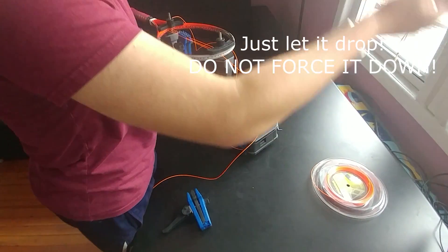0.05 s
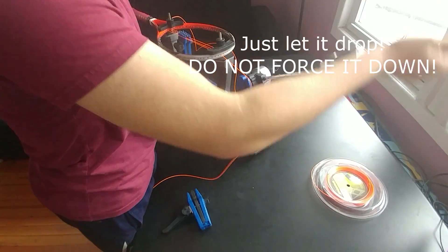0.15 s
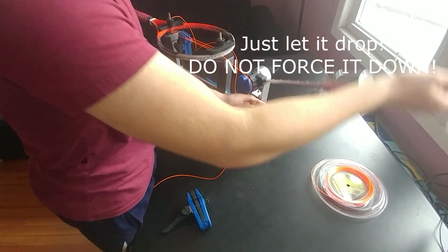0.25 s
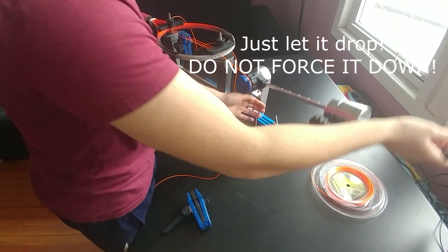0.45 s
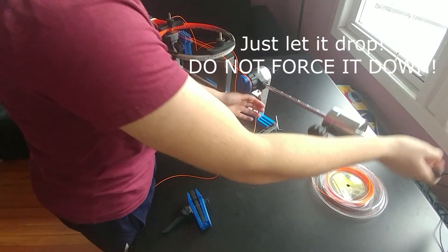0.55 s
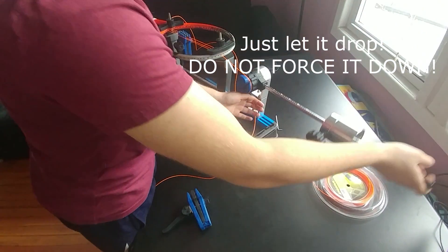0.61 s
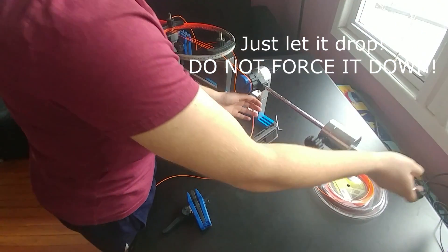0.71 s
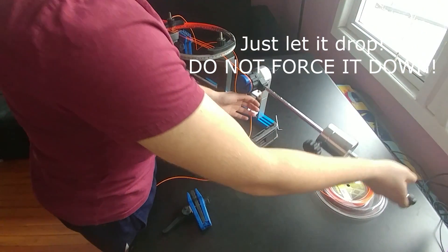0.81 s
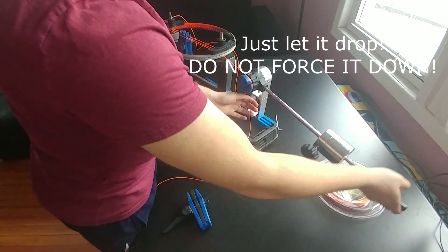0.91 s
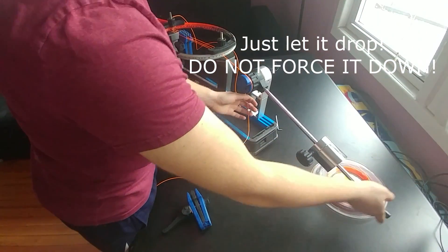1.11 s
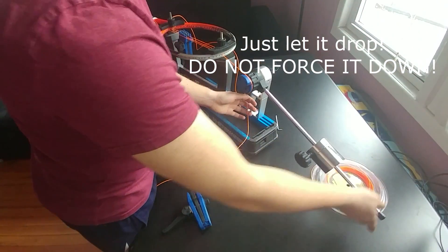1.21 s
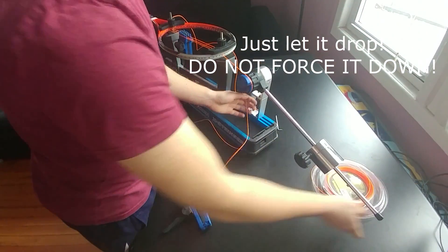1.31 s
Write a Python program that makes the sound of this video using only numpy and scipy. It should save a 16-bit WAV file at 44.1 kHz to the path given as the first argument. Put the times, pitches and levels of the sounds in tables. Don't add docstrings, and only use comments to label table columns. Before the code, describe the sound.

A single sharp click of a drop-weight stringing machine cracks close to the microphone, with a short high string ping and hard room reflections, then only faint soft thuds over low rumble and hiss.

```python
import sys
import numpy as np
from scipy import signal
from scipy.io import wavfile
from scipy.ndimage import uniform_filter1d

SR = 44100
rng = np.random.default_rng(int(sys.argv[2]) if len(sys.argv) > 2 else 0)


def gain_from_db(level_db):
    decades = np.asarray(level_db, float) / 20
    return 10 ** decades


def persist_wave(psi):
    counts = np.round(np.clip(psi, -1, 1) * 32767).astype(np.int16)
    wavfile.write(sys.argv[1], SR, np.atleast_2d(counts).T)


N = 59535

# pitch_hz, level_db [dB per Hz]
RUMBLE_SPECTRUM = [(15, -34), (25, -9.5), (69, 3), (144, -7.5), (229, -7), (300, -8.5), (525, -14.5),
                   (1110, -26.5), (2500, -39), (3250, -75), (5500, -120)]
# start_s, level_db, bright_db [extra above 400 Hz]
RUMBLE_SWELL = [(0, 7.5, -4.5), (0.099, 3.5, 1), (.19, 4.5, 0), (.4, 2, 0.5), (0.529, 0, -1), (.63, 0, -3),
                (.67, 1.5, 8.5), (0.751, -0.5, -0.5), (.87, 1.5, 0.5), (.96, -3, 6), (1.031, 2, 1.5),
                (1.125, -5, 5), (1.2, 2, -4), (1.35, -2.5, 7.5)]
# pitch_hz, level_db [dB per Hz]
HISS_SPECTRUM = [(880, -44), (1500, -4.5), (1720, -4.5), (5490, -8.5), (15100, -11.5), (16000, -13)]
# pitch_hz, likeness [-1 to 1]
PORT_LIKENESS = [(60, 0.71), (150, 0.86), (380, 0.59), (950, -0.078), (2380, 0.0), (5980, -0.03),
                 (15000, -0.02)]
# pitch_hz, level_db, t60_s
TABLE_MODES = [(57, 5.5, 0.35), (72, -0.5, 0.34), (122.2, 2, 0.14), (150.4, 1, 0.28), (230, 2.5, .3),
               (342.3, -2, 0.4), (521, 0.5, 0.19), (697, -3, 0.22), (858, -2.5, 0.21)]
# start_s, level_db, centre_hz, spread_octaves, rise_s
TABLE_THUDS = [(.208, -44, 653, 0.88, 0.0013), (.225, -45, 57, .25, 0.017), (0.256, -41, 225, 0.18, 0.027),
               (.3, -50, 222, 0.32, 0.0046), (0.376, -58, 220, 0.15, 0.0064),
               (0.569, -53.5, 230, 0.26, .01), (0.344, -53, 70, 0.29, 0.012),
               (0.65, -57.5, 297, 0.64, 0.0072), (0.67, -40.5, 72, 0.18, 0.005),
               (0.711, -49, 230, 0.27, 0.0067), (0.842, -53.5, 63.7, 0.27, 0.018),
               (.994, -45.5, 139, 0.57, 0.0075), (1.016, -52.5, 57, 0.32, 0.0061),
               (1.167, -54, 57, 0.21, 0.0057), (1.291, -50, 230, 0.25, 0.015),
               (1.331, -55.5, 146, .6, 0.0056), (.03, -48.5, 57, 0.39, 0.033),
               (.21, -49, 135, 0.65, 0.0016), (1.272, -55.5, 57, 0.25, 0.012)]
# start_s, level_db, right_minus_left_db
STRING_SLIPS = [
    (.2052, -31, 1),
    (.2070, -7, 1),
    (.2086, -7, 10),
    (.2100, -3, 12),
    (.2128, -3, 5),
    (.2145, -6, -2),
]
# pitch_hz, level_db
DIRECT_CRACK = [(300, -23.5), (2000, -17.5), (5000, -9.5), (8000, -9), (16000, -4)]
# pitch_hz, level_db
ROOM_CRACK = [(300, -9.5), (950, -3.5), (1300, -13), (2200, -8.5), (2600, -9.5), (4200, -6.5), (4600, -7),
              (7500, -7.5)]
# pitch_hz, level_db
PORT_RESONANCE = [(7600, -1), (8200, 4.5), (9100, 11.5), (9600, -5), (10300, -7.5), (10750, -27),
                  (11600, -2), (15500, -3.5)]
# pitch_hz, t60_s
ROOM_DECAY = [(200, 0.85), (700, 0.18), (2000, 0.32), (6000, 0.26), (9000, 0.25), (14000, 0.18)]
# pitch_hz, level_db, t60_s
STRING_PARTIALS = [(1116, -1, 0.25), (1122, -11.5, 0.23), (988, -13, 0.16), (2275, -16.5, .36),
                   (2260, -9, 0.1), (3434, -16.5, 0.24), (4670, -14.5, .3), (5830, -15, 0.32),
                   (7060, -18.5, 0.24), (9020, -11.5, .2)]
# start_s, end_s, low_hz, high_hz
SILENT_BANDS = [
    (.232, .355, 10350, 11000),
    (.282, .355, 9650, 11000),
    (.308, .335, 10350, 11600),
]

RUMBLE_DB, HISS_DB = -57, -75
HUM_HZ, HUM_WIDTH_HZ, HUM_DB = 220, 11.7, 8
DIRECT_T60_S, DIRECT_DB = .014, -23
PORT_LAG_S = .0001
ROOM_DB, ROOM_RISE_S = -2, .011
ROOM_BEND_DB = -300
ROOM_MONO_HZ = 610
PING_DB, PING_ROOM_DB = -32, -7
PING_TURN = 1.52
TIGHTEN, TIGHTEN_S = .035, .0312
DAMP_DB = -700
BUZZ_DB, BUZZ_S = 5, .0058
EDGE_HZ = 15620


def evened(x):
    return x / np.sqrt(np.mean(x ** 2) + 1e-20)


def read(points, hz):
    f, value = np.transpose(points)
    return np.interp(np.log(hz + 1), np.log(f + 1), value)


def add(mix, s, sound):
    part = mix[..., round(s * SR):][..., :sound.shape[-1]]
    part += sound[..., :part.shape[-1]]


def noise(field_db, same):
    a, b, c, d = rng.standard_normal((field_db.shape[1], 513, 4)).T
    same = np.clip(same, -1, 1)[:, None]
    left = a + 1j * b
    right = same * left + np.sqrt(1 - same ** 2) * (c + 1j * d)
    z = np.array([left, right]) * gain_from_db(field_db)
    return evened(signal.istft(z, nperseg=1024, noverlap=768)[1][:, :N])


def floor():
    hz = np.fft.rfftfreq(1024, 1 / SR)
    t = np.arange(N // 256 + 5) * 256 / SR
    hum_db = HUM_DB * np.exp(-((hz - HUM_HZ) / HUM_WIDTH_HZ) ** 2 / 2)
    at, swell_db, bright_db = np.transpose(RUMBLE_SWELL)
    rumble_db = (read(RUMBLE_SPECTRUM, hz) + hum_db)[:, None] + np.interp(t, at, swell_db)
    rumble_db = rumble_db + np.interp(t, at, bright_db) * (hz / (hz + 400))[:, None] ** 2
    rumble = noise(rumble_db, read(PORT_LIKENESS, hz))
    hiss = noise(read(HISS_SPECTRUM, hz)[:, None] + 0 * t, 0 * hz)
    return gain_from_db(RUMBLE_DB) * rumble + gain_from_db(HISS_DB) * hiss


def table():
    out, t = np.zeros(N), np.arange(0, .5, 1 / SR)
    chance = rng.random((len(TABLE_THUDS), len(TABLE_MODES), 2))
    for (s, db, centre_hz, spread, rise), draw in zip(TABLE_THUDS, chance):
        ring = np.zeros(len(t))
        for (hz, mode_db, t60), (detune, phase) in zip(TABLE_MODES, draw):
            off_centre_db = -2.8 * (np.log2(hz / centre_hz) / spread) ** 2
            level = gain_from_db(mode_db + off_centre_db - 60 * t / t60)
            ring += level * np.sin(2 * np.pi * (hz * (.98 + .035 * detune) * t + phase))
        push = (1 - np.exp(-t / max(rise, 1e-4))) ** 2
        add(out, s, gain_from_db(db) * push * ring)
    return out * gain_from_db([[-.5], [.5]])


def colour(source, port):
    hz = np.fft.rfftfreq(4096, 1 / SR)
    half = np.log(gain_from_db(read(source, hz) + read(port, hz)))
    whole = np.concatenate([half, half[-2:0:-1]])
    taps = np.fft.ifft(np.exp(np.conj(signal.hilbert(whole)))).real[:1024]
    return taps / np.linalg.norm(taps)


def cracks():
    out, t = np.zeros((2, N)), np.arange(2000) / SR
    grit = rng.standard_normal((len(STRING_SLIPS), len(t)))
    taps = colour(DIRECT_CRACK, PORT_RESONANCE)
    for (s, db, right_db), g in zip(STRING_SLIPS, grit):
        burst = g * gain_from_db(-60 * t / DIRECT_T60_S)
        crack = gain_from_db(DIRECT_DB + db) * signal.oaconvolve(burst, taps)
        add(out[0], s + PORT_LAG_S, gain_from_db(-right_db / 2) * crack)
        add(out[1], s, gain_from_db(right_db / 2) * crack)
    return out


def room(x):
    slots = np.arange(40, SR // 2, 8)
    shape = (2, len(slots))
    taps = np.zeros((2, SR // 2 + 8))
    places = slots + rng.integers(0, 8, shape)
    np.put_along_axis(taps, places, rng.choice([-1., 1.], shape), 1)
    hz, t, z = signal.stft(taps, SR, nperseg=256)
    same = np.exp(-(hz / ROOM_MONO_HZ) ** 2)[:, None]
    z = np.array([z[0], same * z[0] + np.sqrt(1 - same ** 2) * z[1]])
    decay_db = -60 * t / read(ROOM_DECAY, hz)[:, None] + ROOM_BEND_DB * t * t
    tail = signal.istft(z * gain_from_db(decay_db), SR, nperseg=256)[1]
    tail = tail * (1 - np.exp(-np.arange(tail.shape[1]) / SR / ROOM_RISE_S))
    return signal.fftconvolve(x[None], tail / np.linalg.norm(tail[0]), axes=1)[:, :N]


def ping():
    out, t = np.zeros((2, N)), np.arange(0, .5, 1 / SR)
    turn = PING_TURN * np.array([[1], [0]])
    slid = t - TIGHTEN * TIGHTEN_S * (1 - np.exp(-t / TIGHTEN_S))
    span = max(round(BUZZ_S * SR), 1)
    buzz = rng.standard_normal((len(STRING_PARTIALS), 2, len(t)))
    buzz = evened(uniform_filter1d(uniform_filter1d(buzz, span), span))
    ring = np.zeros((2, len(t)))
    for (hz, db, t60), b in zip(STRING_PARTIALS, buzz):
        level = gain_from_db(db - 60 * t / t60 + DAMP_DB * t * t + BUZZ_DB * b)
        ring += level * np.sin(2 * np.pi * hz * slid - turn)
    attack = np.minimum(t / .0044, 1)
    add(out, STRING_SLIPS[2][0], gain_from_db(PING_DB) * attack * ring)
    return out


def scene():
    background = floor() + table()
    direct, ring, into_room = cracks(), ping(), np.zeros(N)
    add(into_room, STRING_SLIPS[1][0], gain_from_db(ROOM_DB) * colour(ROOM_CRACK, PORT_RESONANCE))
    into_room = into_room + gain_from_db(PING_ROOM_DB) * ring[1]
    return background + direct + ring + room(into_room)


def low_pass(x):
    return signal.sosfilt(signal.butter(12, 16830, fs=SR, output="sos"), x)


def record(dry):
    hz, t, z = signal.stft(dry, SR, nperseg=512, noverlap=384)
    audible = (hz > 0)[:, None]
    keep = np.ones(z.shape[1:]) * audible
    for start, end, low_hz, high_hz in SILENT_BANDS:
        band = ((hz > low_hz) & (hz < high_hz))[:, None]
        keep = keep * ~(band & (t > start) & (t < end))
    lost = signal.istft(z * (1 - keep) * audible, SR, nperseg=512, noverlap=384)[1][:, :N]
    bass_cut = signal.butter(4, 36, "high", fs=SR, output="sos")
    x = signal.sosfilt(bass_cut, dry - lost)
    edge = signal.firwin(511, EDGE_HZ, window=("kaiser", 9), fs=SR)
    return low_pass(signal.oaconvolve(x, edge[None], "same"))


dry = scene()
out = record(dry)
persist_wave(out)
```